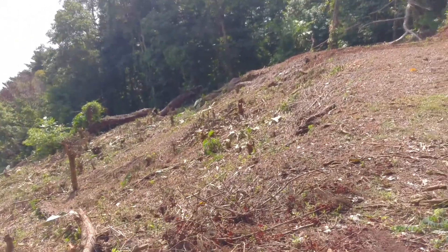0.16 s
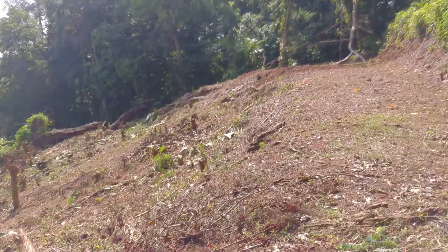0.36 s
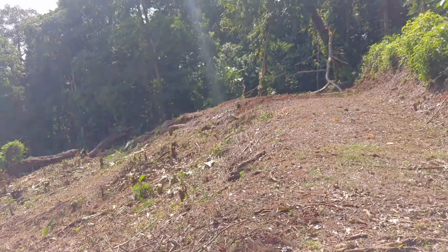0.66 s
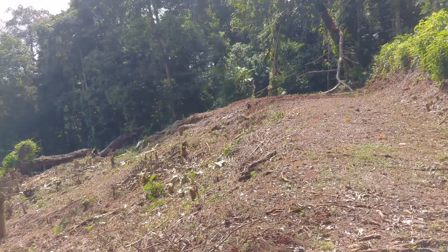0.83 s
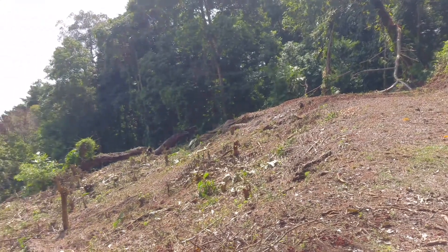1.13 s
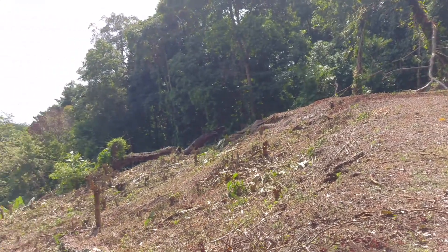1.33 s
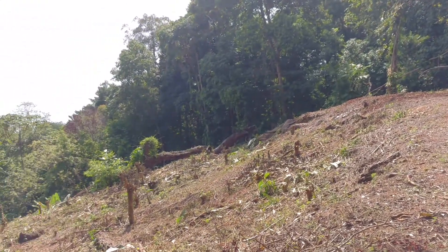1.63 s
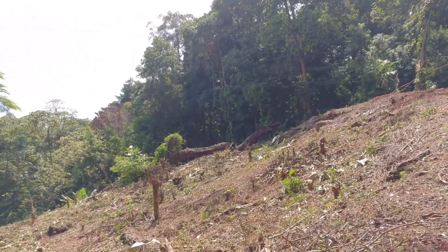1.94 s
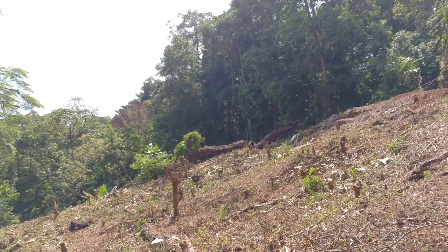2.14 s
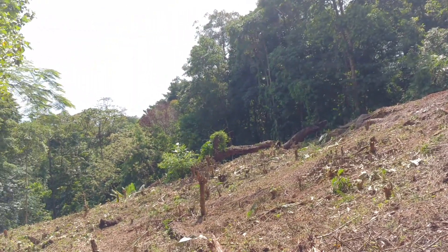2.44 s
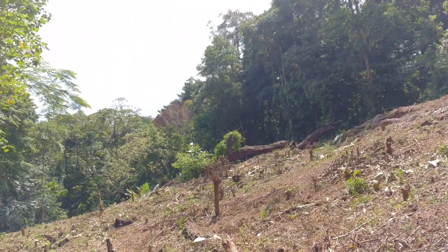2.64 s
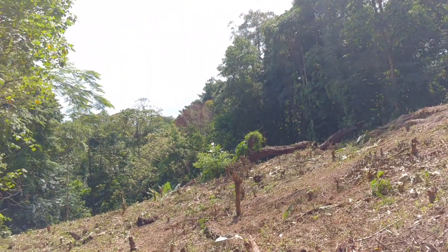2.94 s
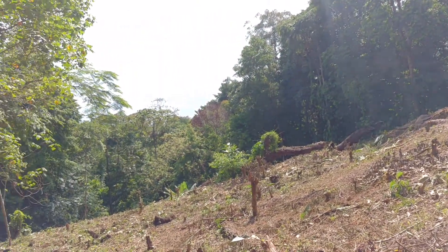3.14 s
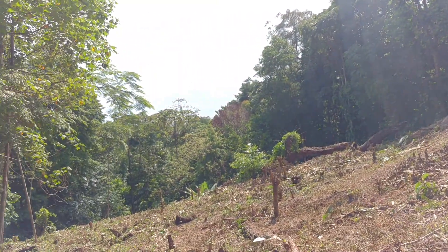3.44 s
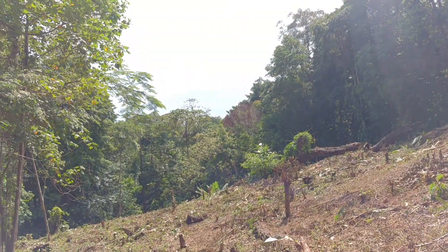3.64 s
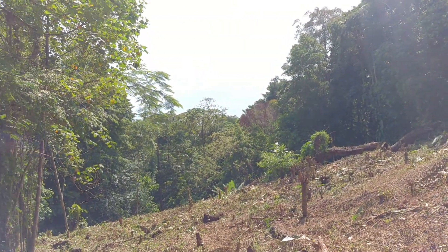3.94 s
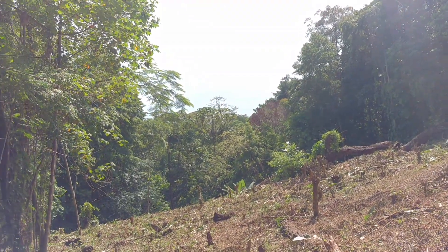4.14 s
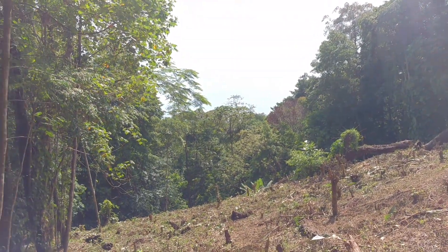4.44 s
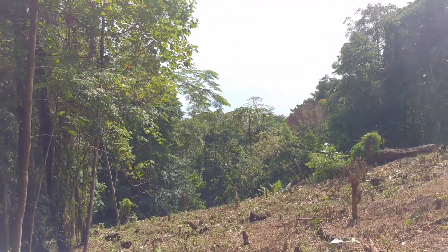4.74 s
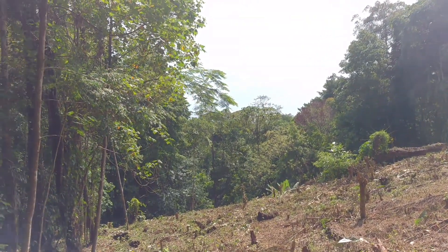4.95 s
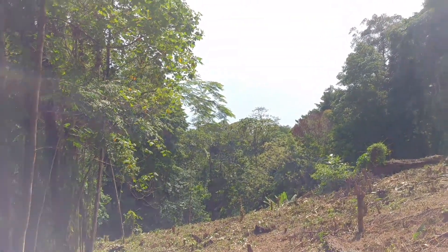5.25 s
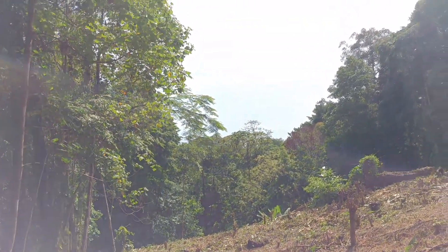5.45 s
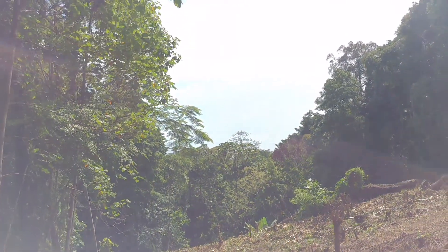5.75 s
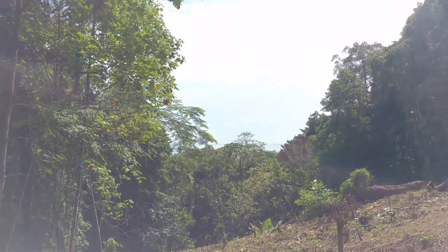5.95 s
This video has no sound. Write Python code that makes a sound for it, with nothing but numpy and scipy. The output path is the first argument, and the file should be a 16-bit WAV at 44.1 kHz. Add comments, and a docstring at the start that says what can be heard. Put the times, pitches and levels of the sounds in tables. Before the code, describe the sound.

Outdoors at a forest edge, two layers of distant cicadas drone continuously, high and shimmering, over soft air hiss and a faint low rumble. Short buzzing insect chirps recur, and a quick bird whistle phrase comes after two seconds. A handheld phone picks up ticks at the start, harder finger knocks just before five seconds, then clothes rustling to the end.

```python
"""Two cicada choruses drone from a tropical forest; a buzzing insect chirps and small birds whistle among them.
Air, far rumble and a faint hum lie underneath; fingers tick on the phone, and clothes rustle mostly near the end.
Insects are uneven clicks ringing in hollow bodies, whistles are gliding sines, and air, cloth and hum are
shaped noise. The forest adds echoes, and the phone widens the picture by subtracting each port, delayed,
from the other."""
import sys
import numpy as np
from scipy import signal
from scipy.fft import rfft, irfft, next_fast_len
from scipy.io import wavfile
from scipy.ndimage import uniform_filter1d

SR = 44100
rng = np.random.default_rng(int(sys.argv[2]) if len(sys.argv) > 2 else 0)


def volts(x):
    """Linear amplitude factor 10**(x/20) for a level x in dB, scalar or array-like."""
    e = np.asarray(x, float) / 20
    return 10 ** e


def generate_wav(sig):
    """Save sig (samples, or channels by samples) to the path in sys.argv[1] as 16-bit PCM at SR."""
    pcm = np.round(np.clip(np.atleast_2d(sig).T, -1, 1) * 32767).astype(np.int16)
    wavfile.write(sys.argv[1], SR, pcm)


N = 268436  # length in samples
SIZE = next_fast_len(N, True)
T = np.arange(N) / SR  # time of every sample, s
HZ = np.fft.rfftfreq(SIZE, 1 / SR)  # frequency of every bin, Hz


def unit(x):
    """Scale to an rms (average strength) of 1."""
    return x / np.sqrt(np.mean(x ** 2))


def spectrum(x):
    """Turn a sound into its frequencies."""
    return rfft(x, SIZE)


def sound(bins):
    """Turn frequencies back into a sound."""
    return irfft(bins, SIZE)[..., :N]


def peak_one(bins):
    """Scale a hit so that its highest peak is 1."""
    return bins / np.max(np.abs(sound(bins)))


def curve(table, column=1):
    """Join the points of one column with straight lines over time; column 0 holds the times."""
    columns = np.transpose(table)
    return np.interp(T, columns[0], columns[column])


def over_hz(table):
    """Join (f/Hz, value) points over all bins, straight on a log frequency scale."""
    hz, value = np.transpose(table)
    return np.interp(np.log(HZ + 1), np.log(hz), value)


def ring(hz, width_hz):
    """One resonance: it passes pitches near hz and weakens the others."""
    return 1 / (1 + 1j * (HZ - hz ** 2 / (HZ + 1e-9)) / width_hz)


def lag(ms):
    """A delay, which turns the phase of each frequency in proportion to its pitch."""
    return np.exp(-2j * np.pi * HZ * ms / 1000)


def from_side(x, right_db, right_ms):
    """One source reaches both ports; the right one gets it weaker or later."""
    return sound(spectrum(x) * np.array([lag(0), volts(right_db) * lag(right_ms)]))


def walk(rate):
    """A wandering curve of spread 1: random steps, rate per second, smoothed twice."""
    step = int(SR / rate)
    stairs = np.repeat(rng.standard_normal(N // step + 1), step)
    smooth = uniform_filter1d(uniform_filter1d(stairs, step), step)
    return unit(smooth[:N])


def clicks(rate, jitter, scatter_db):
    """An uneven train of clicks from wings or tymbals (the cicadas' drum skins)."""
    chance = rng.standard_normal((int(N / SR * 600), 2))
    gaps = 1 + jitter * chance[:, 0]
    at = (np.cumsum(gaps) + rng.random()) * SR / rate
    inside = at < N
    out = np.zeros(N)
    out[at[inside].astype(int)] = volts(scatter_db * chance[inside, 1])
    return out


def forest(x, t60, wet_db, size=4096):
    """Trunks and leaves scatter a sound into a tail that differs at the ports and renews as leaves and phone move."""
    t = np.arange(4 * size) / SR
    starts = np.arange(0, N + size, size)
    # overlapping pieces, each with an echo tail of its own
    padded = np.pad(x, ((0, 0), (size, 3 * size)))
    window = np.sin(np.pi * np.arange(2 * size) / (2 * size))
    pieces = padded[:, starts[:, None] + np.arange(2 * size)] * window
    # a tail builds up over about 5 ms and falls by 60 dB in t60 seconds
    fade = np.exp(-np.log(1000) * t / t60) * (1 - np.exp(-t / 0.005))
    tails = rng.standard_normal((2, len(starts), len(t))) * fade
    tails *= volts(wet_db) / np.sqrt(np.sum(tails ** 2, axis=2, keepdims=True))
    echoes = signal.fftconvolve(pieces, tails, axes=2)
    wet = np.zeros((2, N + 8 * size))
    for start, echo in zip(starts, echoes.transpose(1, 0, 2)):
        wet[:, start:start + echo.shape[1]] += echo
    return x + wet[:, size:size + N]


def chorus(low_hz, high_hz, width_hz, rate, throb_db, count=9):
    """Many cicadas, each clicking into its own hollow body from its own side, throbbing alone."""
    out = 0
    for hz in np.linspace(low_hz, high_hz, count):
        own_rate = rate * (1 + .12 * rng.standard_normal())
        song = clicks(own_rate, jitter=.3, scatter_db=2.0) * volts(throb_db * walk(14))
        side_ms = 0.2544 * rng.standard_normal()
        body = ring(hz, width_hz) ** 2
        out = out + spectrum(song) * body * np.array([lag(0), lag(side_ms)])
    return unit(sound(out))


def cicadas():
    """A high and a low chorus whose levels drift slowly."""
    # chorus levels ahead of the forest and mix: (t/s, high chorus/dB, low chorus/dB)
    drift = [(0, -43, -49.5), (.3, -42, -50.5), (1.0, -41.5, -48), (2.0, -41, -48.5), (3.2, -41, -49),
             (4.4, -42.5, -48.5), (5.2, -43.5, -48.5), (6.09, -45.5, -48)]
    # singers: (lowest f/Hz, highest f/Hz, width of each of two resonance passes/Hz,
    # average click rate/per s, spread of the throb/dB)
    high_singers = (8510, 9985, 896, 310, 0.41)
    low_singers = (6944, 7330, 473, 230, 0.67)
    high = volts(curve(drift, column=1)) * chorus(*high_singers)
    low = volts(curve(drift, column=2)) * chorus(*low_singers)
    return high + low


def chirps():
    """A fast wing buzz, swelling quickly and fading, its band a few hundred hertz wide."""
    # buzzing chirps ahead of the forest and mix: (start t/s, f/Hz, level/dB)
    calls = [(.358, 4970, -57.5), (.52, 4770, -60), (.715, 4720, -57.5), (1.356, 4950, -56),
             (1.65, 5030, -58.5), (1.946, 4770, -58), (3.02, 4820, -55.5), (3.345, 4900, -60.5),
             (3.48, 3860, -59.5), (3.86, 4760, -56), (4.69, 4830, -56), (5.25, 4700, -56.5),
             (5.857, 4600, -52)]
    length_s, attack_s, fade_s = .13, 0.0061, .09
    out = np.zeros(N)
    buzz = spectrum(clicks(160, jitter=.1, scatter_db=2.3))
    for start, hz, db in calls:
        swell = np.clip((T - start) / attack_s, 0, 1)
        fade = np.clip((start + length_s - T) / fade_s, 0, 1)
        out += volts(db) * swell * fade * unit(sound(buzz * ring(hz, 540) ** 2))
    return from_side(out, right_db=-2.5, right_ms=.02)


def birds():
    """Short gliding sine whistles with a quick warble; a far bird repeats one rising note."""
    # near bird's whistles, ahead of the forest: (start t/s, end t/s, from f/Hz, to f/Hz, level/dB)
    near = [(.58, .626, 3700, 4180, -56.5), (2.184, 2.24, 3400, 4160, -51), (2.248, 2.278, 4400, 5200, -48),
            (2.366, 2.386, 5250, 5330, -47), (2.4, 2.438, 4700, 4940, -47),
            (2.424, 2.467, 4800, 3330, -46.5), (2.487, 2.518, 4450, 3220, -48.5),
            (5.721, 5.78, 3750, 4180, -57), (5.895, 5.95, 4200, 3610, -49.5)]
    first_s, every_s, note_s, notes = 1.225, .275, .085, 4
    from_far_hz, to_far_hz, far_db = 2330, 2700, -58
    far = [(s, s + note_s, from_far_hz, to_far_hz, far_db) for s in first_s + every_s * np.arange(notes)]
    out = np.zeros(N)
    for start, end, from_hz, to_hz, db in near + far:
        progress = np.clip((T - start) / (end - start), 0, 1)
        glide = from_hz + (to_hz - from_hz) * progress
        hz = glide * (1 + .006 * walk(120))
        swell = np.abs(np.sin(np.pi * progress)) ** .5
        out += volts(db) * swell * np.sin(2 * np.pi * np.cumsum(hz) / SR)
    return from_side(out, right_db=-0.64, right_ms=0.037)


def ticks():
    """Cracks of nail on plastic, and soft pushes near the right port that rock the case."""
    # resonances of the pushed case: (f/Hz, width/Hz, relative level/dB, direction of first swing)
    resonances = [(95, 45, 10.5, -1), (360, 260, 5, 1), (900, 800, -1, 1)]
    # nail on the case: (t/s, peak level at the left port/dB)
    snaps = [(.0932, -20), (.357, -30), (4.8934, -24), (5.363, -33), (5.823, -25), (5.869, -29),
             (5.895, -29), (5.967, -39)]
    # finger pushes: (t/s, peak level at the right port/dB, push/ms, left port as a share of the right)
    knocks = [(.045, -33, .61, -.55), (.357, -35, .12, .5), (4.639, -20, .28, -.11), (5.025, -30, .1, .3),
              (4.8642, -18.5, .22, -.1), (4.8825, -30, .6, -.3), (4.8934, -14.5, .13, -.1)]
    case = sum(swing * volts(db) * ring(hz, width) for hz, width, db, swing in resonances)
    rattle = spectrum(rng.standard_normal(200) * np.exp(-np.arange(200) / (.0006 * SR)))
    crack = peak_one((1 + .4 * rattle) * ring(7000, 11000))
    crack = crack * np.array([lag(0.015), 1.5 * lag(0)])  # right port louder and earlier
    out = sum(volts(db) * crack * lag(1000 * s) for s, db in snaps)
    for s, db, push_ms, left in knocks:
        # a longer push is softer: it has less treble
        softness = np.exp(-(2 * np.pi * HZ * push_ms / 1000) ** 2 / 2)
        thump = peak_one(case * softness * lag(2 * push_ms))
        out = out + volts(db) * thump * np.array([[left], [1]]) * lag(1000 * s)
    return sound(out)


def rustle():
    """Cloth fibres slip in dense grains of uneven size; each stroke swells and stops quicker."""
    # tone colour of cloth: (f/Hz, relative level per Hz/dB)
    colour = [(500, -24), (1100, 5), (1800, 2), (2600, -3), (4800, 0), (8000, -11.5), (12500, -7),
              (15300, -12.5)]
    # strokes of cloth: (loudest t/s, level/dB, swell/s)
    strokes = [(.07, -51, 0.19), (5.04, -53, 0.046), (5.24, -41.5, 0.095), (5.41, -43.5, 0.07),
               (5.62, -49.5, 0.077), (5.71, -48.5, 0.067), (5.83, -43, 0.098), (5.91, -48, 0.045),
               (6.0, -45.5, 0.094)]
    drop_db, fade_share = 11.5, 0.55  # fall over one swell time; fade time as a share of the swell
    grains = rng.standard_normal((2, N)) * volts(2.6 * rng.exponential(size=N)) * volts(2 * walk(90))
    level = 0
    for s, db, swell in strokes:
        away = np.maximum((s - T) / swell, (T - s) / (swell * fade_share))
        level = level + volts(db - drop_db * away ** 2)
    return level * unit(sound(spectrum(grains) * volts(over_hz(colour))))


def air():
    """Air and far rumble: noise in octave bands that swell alone; the bass is mostly shared, left first."""
    # air and far rumble at the ports: (f/Hz, level per Hz/dB)
    loudness = [(35, -81.5), (70, -68.5), (130, -67.5), (230, -66.5), (400, -73.5), (700, -80), (1000, -84),
                (1500, -86), (1900, -85.5), (2400, -87), (4300, -92.5), (5700, -93.5), (6600, -98),
                (11800, -99), (14200, -99), (15400, -102)]
    # how alike the ports are: (f/Hz, share of the power common to both)
    likeness = [(30, 0.82), (120, 0.89), (250, 0.9), (600, 0.71), (1200, 0.29), (3000, 0.014)]
    share = np.clip(over_hz(likeness), 0, 1)
    noise = spectrum(rng.standard_normal((3, N))) * volts(over_hz(loudness)) * np.sqrt(SR / 2)
    common, left, right = noise
    together = np.sqrt(share) * common * np.array([lag(0), volts(-0.5) * lag(0.2)])
    ports = together + np.sqrt(1 - share) * np.array([left, right])
    out = 0
    for octave in np.arange(5, 14.6, 1):  # powers of two, from about 32 Hz to 16 kHz
        band = np.cos(np.pi / 2 * np.clip(np.log2(HZ + 1) - octave, -1, 1)) ** 2
        swell_db = 0.5 * walk(1.48) + 1.06 * walk(9)
        out = out + volts(swell_db) * sound(ports * band)
    return out


def hum():
    """Thin tones from the left, made of narrow noise, that waver and fade as the phone turns."""
    # centre of each tone: (f/Hz)
    pitches = [185, 694.4, 766.3, 1277, 1787.4]
    # the same tones: (width of each of two resonance passes/Hz, level at first/dB, level at last/dB)
    shapes = [(30, -46.5, -46), (4, -61.5, -65), (2.5, -65.5, -69), (2.04, -65.5, -68.5), (2, -63, -88)]
    tones = 0
    for hz, (width, first_db, last_db) in zip(pitches, shapes):
        noise = spectrum(rng.standard_normal(N))
        tone = unit(sound(noise * ring(hz, width) ** 2))
        tones = tones + volts(np.linspace(first_db, last_db, N)) * tone
    return from_side(tones, right_db=-3, right_ms=0.17)


def scene():
    """All sources at the two microphone ports; the choruses are deep in the trees, mostly echo."""
    drone = volts(-5.5) * forest(cicadas(), t60=0.58, wet_db=5.0)
    buzzes = volts(-0.5) * forest(chirps(), t60=1.0, wet_db=9)
    whistles = forest(birds(), t60=.4, wet_db=3)
    return drone + buzzes + whistles + ticks() + rustle() + air() + hum()


def roll_off(x):
    """The treble ends steeply here."""
    return signal.sosfilt(signal.butter(12, 15600, fs=SR, output="sos"), x)


def record(dry):
    """Widen the picture: each side is its port minus the other port, delayed and mostly a little duller."""
    # delay of the subtracted port: (f/Hz, delay/ms)
    cross_delay = [(1200, .41), (3700, .402), (5200, .388), (7700, .39), (13000, .395)]
    # strength of the subtracted port: (f/Hz, share)
    cross_share = [(100, .8), (2500, .76), (6000, .64), (10000, .55), (14000, .6)]
    right_db = -1.4  # the right port is less sensitive
    ports = spectrum(dry * np.array([[1], [volts(right_db)]]))
    other = over_hz(cross_share) * lag(over_hz(cross_delay)) * ports[::-1]
    wide = sound(ports - other)
    return roll_off(wide)


dry = scene()
out = record(dry)
generate_wav(out)
```